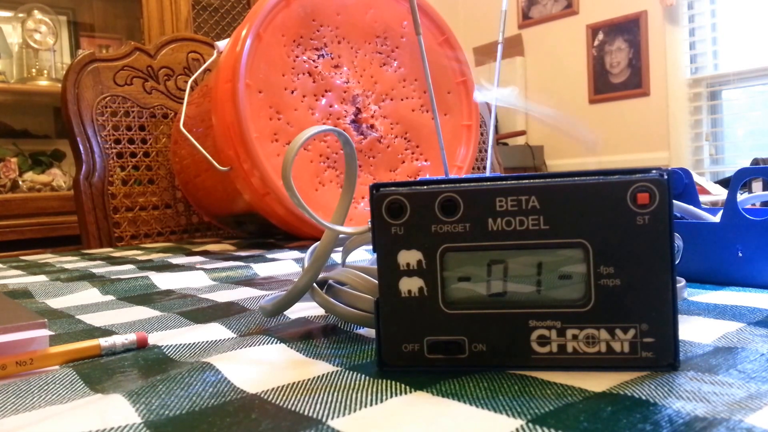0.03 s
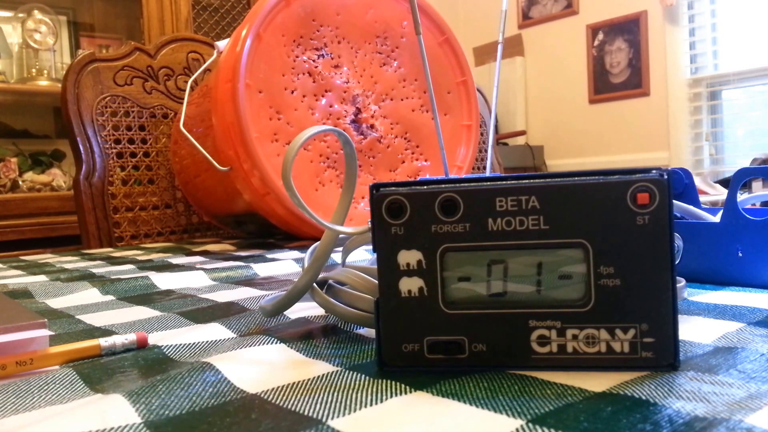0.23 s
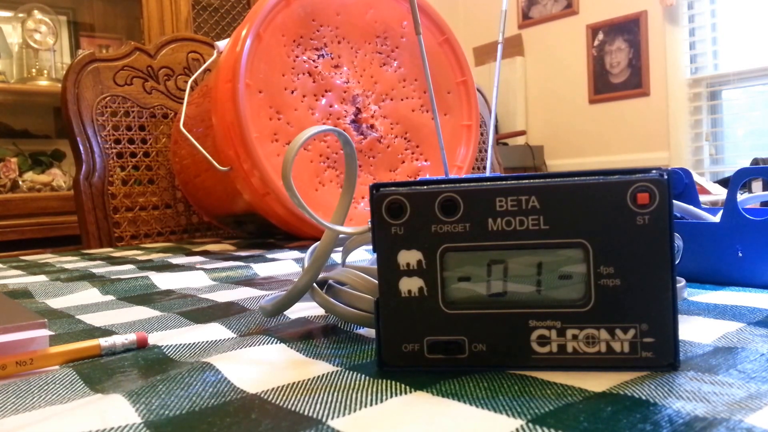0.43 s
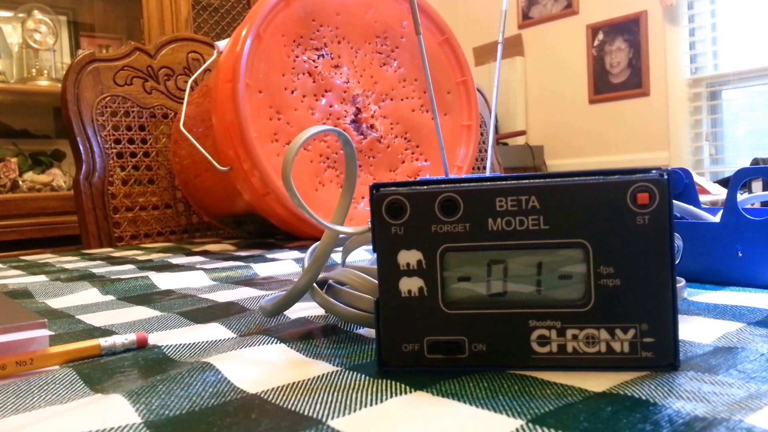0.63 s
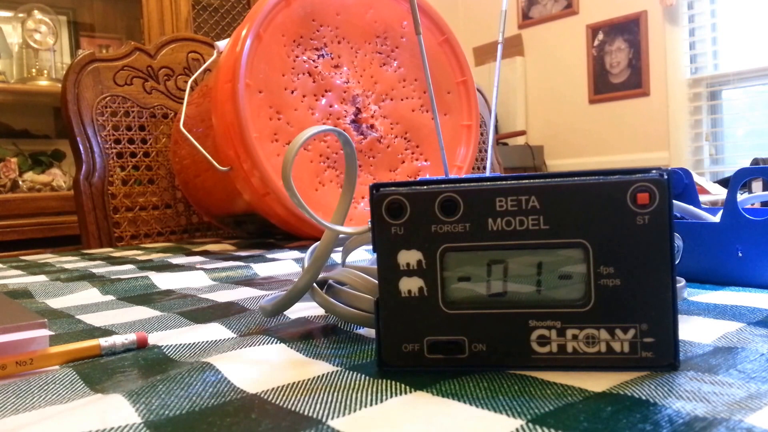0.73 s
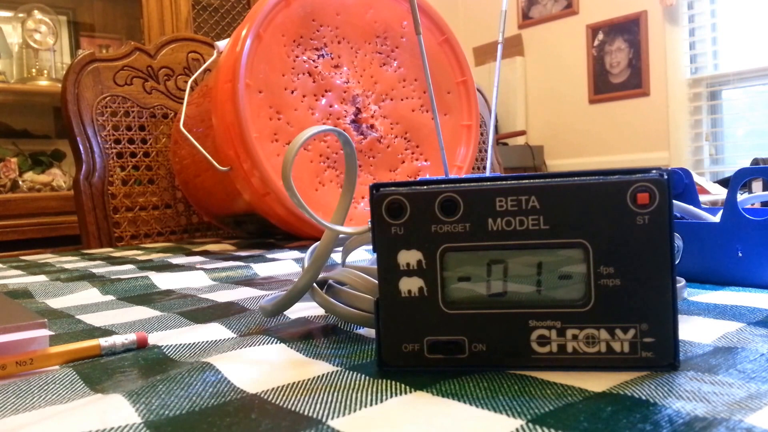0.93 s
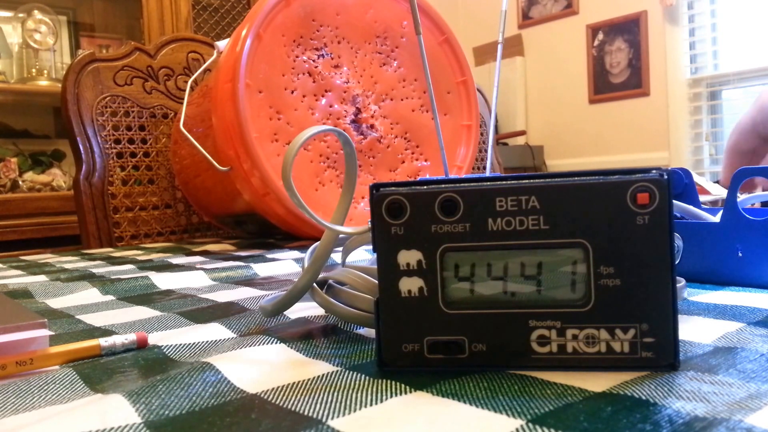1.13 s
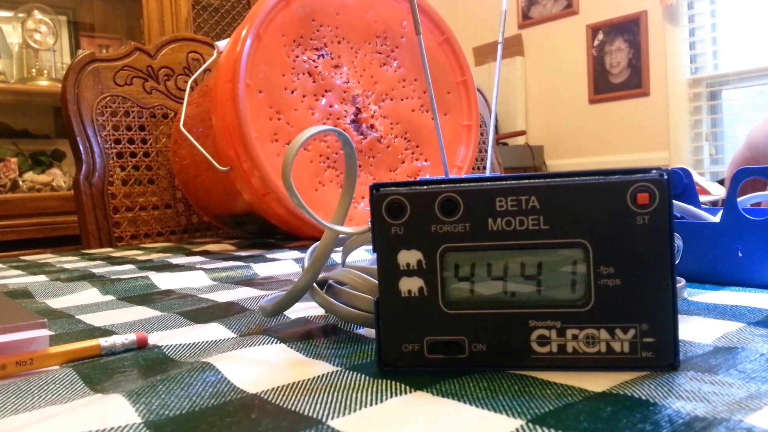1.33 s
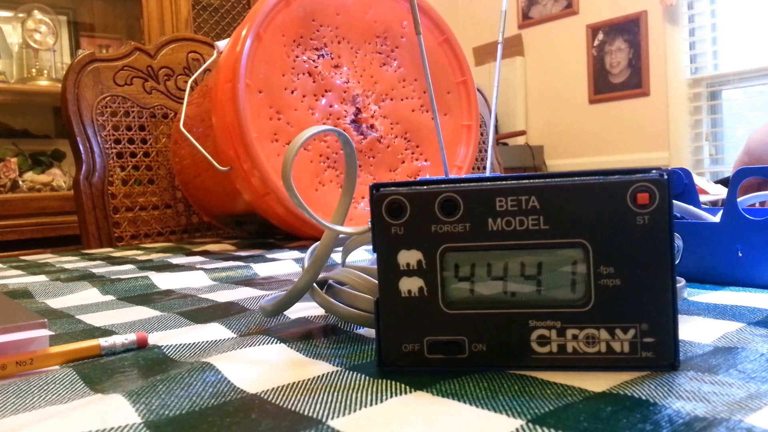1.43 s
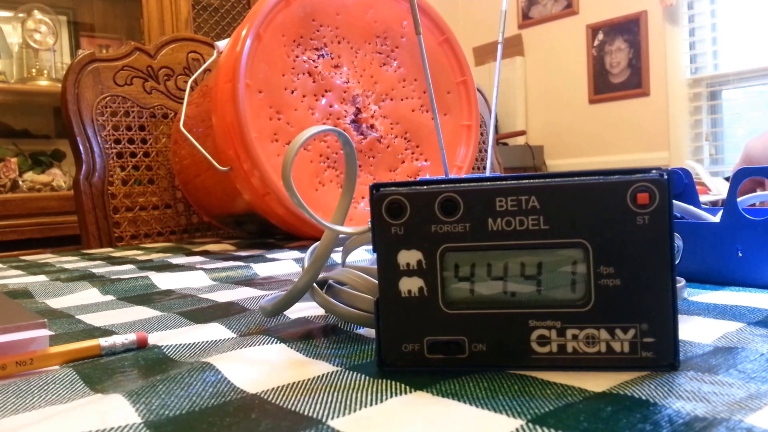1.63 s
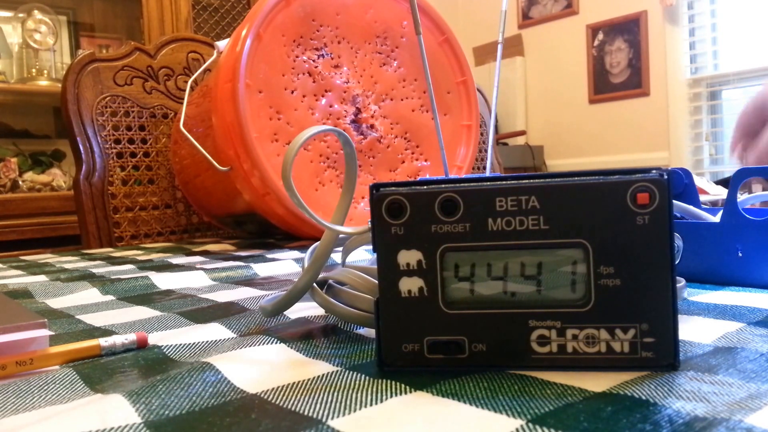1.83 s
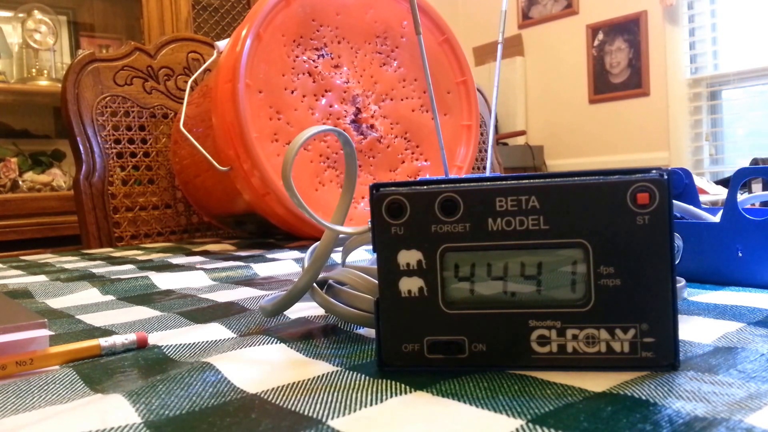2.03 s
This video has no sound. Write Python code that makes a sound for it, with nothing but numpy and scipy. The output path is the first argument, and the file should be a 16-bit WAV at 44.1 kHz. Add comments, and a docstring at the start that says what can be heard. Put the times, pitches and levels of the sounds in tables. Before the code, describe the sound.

A rubber band launcher goes off almost immediately: thin ticks at 0.03 seconds, then a tight burst of hard plastic slaps, loudest near 0.11, with rattling and hollow bucket knocks. A faint swish follows around 0.3 as the short room tail fades. Quiet hum and hiss remain. From 0.8 to 1.55 something slides with a faint low groan and rustle; small clicks cluster at 1.6 to 1.8, then it quiets.

```python
"""Rubber band launcher and plastic bucket

A rubber band is let go on a table: its launcher rattles (noise bursts, random grains, a dull thud) and the
band slaps a plastic bucket, which booms and rocks (dying modes). Then something slides with a low groan
(rough gliding sine), faint squeal (resonant noise) and rustle; small clicks and low bumps (resonant noise
bursts) are scattered through the sliding. A furnished room answers with noise tails; room hum and
microphone hiss are slowly wavering coloured noise."""
import sys
import numpy as np
from scipy import signal
from scipy.fft import rfft, irfft, next_fast_len
from scipy.io import wavfile
from scipy.ndimage import map_coordinates

SR = 44100
rng = np.random.default_rng(int(sys.argv[2]) if len(sys.argv) > 2 else 0)


def amplitude_ratio(level_db):
    """Convert a level in decibels to the matching linear amplitude (field) ratio."""
    exponent = np.asarray(level_db, float) / 20
    return 10 ** exponent


def wav_out(sig):
    """Save sig, one row per channel (or a flat mono array), as 16-bit PCM at SR to the path in sys.argv[1]."""
    wavfile.write(sys.argv[1], SR, np.round(np.clip(np.atleast_2d(sig).T, -1, 1) * 32767).astype(np.int16))


N = 91198


def unit(x):
    """Scale to rms 1."""
    return x / np.sqrt(np.mean(x ** 2) + 1e-20)


def along(points, hz):
    """Interpolate (hz, value) points on a log frequency axis."""
    point_hz, value = np.transpose(points)
    return np.interp(np.log(hz + 1), np.log(point_hz + 1), value)


def curves(rows):
    """One value per sample for each column after the time."""
    time_s, *columns = np.transpose(rows)
    return [np.interp(np.arange(N) / SR, time_s, column) for column in columns]


def wobble(knots_per_s):
    """Smooth random curve through normal-distributed knots."""
    knots = rng.standard_normal(int(N * knots_per_s / SR) + 4)
    return map_coordinates(knots, [np.arange(N) * knots_per_s / SR])


def filtered(x, response):
    """Apply a complex response of frequency."""
    n = x.shape[-1]
    padded = next_fast_len(n + 8192)
    return irfft(rfft(x, padded) * response(np.fft.rfftfreq(padded, 1 / SR)), padded)[..., :n]


def treble_of(x):
    """Zero-phase high-pass, half amplitude near 6 kHz."""
    return filtered(x, lambda hz: 1 / (1 + (6000 / (hz + 1)) ** 4))


def resonances(rows):
    """Causal response of (centre_hz, width_hz, level_db) peaks, alternating in sign."""
    def response(hz):
        total = 0
        for k, (centre, width, db) in enumerate(rows):
            damping = 1j * hz * width
            total = total + (-1) ** k * amplitude_ratio(db) * damping / (centre * centre - hz * hz + damping)
        return total
    return response


PITCH_SCATTER, LEVEL_SCATTER_DB = .025, 2.56  # standard deviations; pitch as a fraction


def rings(modes, near_hz, fall_db, share, t):
    """Close pairs of dying modes, losing fall_db per octave from the struck region; peak 1."""
    hz, level_db, t60_s = np.repeat(np.transpose(modes), 2, axis=1)[:, :, None]
    level_draw, pitch_draw = rng.standard_normal((2, *hz.shape))
    struck_db = level_db - fall_db * abs(np.log2(hz / near_hz)) + LEVEL_SCATTER_DB * level_draw
    decay_db = -60 * t / (share * t60_s)
    pairs = amplitude_ratio(struck_db + decay_db) * np.sin(2 * np.pi * hz * (1 + PITCH_SCATTER * pitch_draw) * t)
    ring = pairs.sum(0)
    return ring / np.abs(ring).max()


RISE_S = .0004  # time constant


def burst(spectrum, t60_s):
    """Coloured noise that rises fast and dies away; peak 1."""
    t = np.arange(4096) / SR
    noise = filtered(rng.standard_normal(4096), lambda hz: amplitude_ratio(along(spectrum, hz)))
    x = noise * amplitude_ratio(-60 * t / t60_s) * (1 - np.exp(-t / RISE_S))
    return x / np.abs(x).max()


WIDEST_DB = 8.5


def add(out, start_s, sound, db, left_right_db):
    """Place a sound by level difference, limited to WIDEST_DB."""
    at = round(start_s * SR)
    half_db = np.clip(left_right_db, -WIDEST_DB, WIDEST_DB) / 2
    sides = amplitude_ratio(db + np.array([[half_db], [-half_db]])) * sound
    out[:, at:at + len(sound)] += sides[:, :N - at]


# noise likeness of left and right: hz, likeness
ALIKE = [(40, 0.16), (300, 0.78), (1000, 0.13), (3000, 0.033), (12000, 0.08)]


def rush(spectrum):
    """Stereo noise of rms 1, mid and side shares set by the likeness."""
    def shares(hz):
        angle = np.arccos(np.clip(along(ALIKE, hz), -1, 1)) / 2
        return amplitude_ratio(along(spectrum, hz)) * [np.cos(angle), np.sin(angle)]
    mid, side = filtered(rng.standard_normal((2, N)), shares)
    return unit(np.array([mid + side, mid - side]))


# release ticks, thin and high: start_s, peak_db, left_right_db
TICKS = [(0.0253, -20.5, -1), (.030, -17.5, 2.5), (0.0344, -10, 3), (0.046, -6, -3), (0.1091, -14, 2.5),
         (0.298, -34.5, 7)]
# tick spectrum: hz, level_db
TICK_SPECTRUM = [(880, -36), (1500, 6), (3820, -6), (6140, -19.5), (11200, -9.5), (14200, -11),
                 (15800, -22.5)]
# hard plastic slaps: start_s, peak_db, struck_region_hz, left_right_db
SLAPS = [(0.050, -12.5, 3800, 5), (0.0531, -8.5, 3140, 2), (0.0565, -8.5, 2400, 6.5), (0.0643, -8, 3050, 5),
         (0.0772, -9, 3200, -1.5), (0.0865, -7, 3270, -0.5), (0.1098, -0.5, 4360, -4),
         (0.1134, -10.5, 3200, -2.5), (.125, -10.5, 4200, 1.5), (0.1299, -9, 4240, -5.5)]
# slap crack spectrum: hz, level_db
CRACK_SPECTRUM = [(1000, -26), (1600, -6), (3100, 2), (4400, -6), (5860, -19), (10900, -18.5),
                  (14500, -30.5), (15800, -45.5)]
# plastic modes the slaps ring: hz, level_db, t60_s
PLASTIC_MODES = [(2310, -11, .012), (3270, 0, 0.027), (3800, -6.5, .014), (4240, 1, .02)]
# rattle of loose parts, then slack band swishing down: time_s, level_db, treble_lift_db
RATTLE = [(.023, -62, 3.5), (.026, -36, -0.5), (.034, -25, 2), (.044, -33.5, 4), (.05, -18.5, -6),
          (.07, -24.5, 1.5), (.108, -28.5, -4.5), (.112, -20.5, 4), (.13, -22.5, -2), (.15, -33.5, -2),
          (.28, -57, -2), (.3, -41, 2.5), (.315, -35, -1), (.37, -53, 2), (.42, -59, 2)]
# rattle spectrum: hz, level_db
RATTLE_SPECTRUM = [(400, -16), (800, -4.5), (1200, -8), (1620, -13), (2400, -6), (3250, -7.5), (4280, -5.5),
                   (4900, -12.5), (6060, -16), (14000, -25), (15800, -57)]
TICK_T60_S, CRACK_T60_S = 0.0076, 0.0066
SLAP_FALL_DB_PER_OCTAVE, SLAP_RING_DB = 28.5, 3.5  # ring level is relative to the crack
RATTLE_PER_S, RATTLE_SPREAD_DB = 5000, 2


def launcher():
    """Impacts excite short noise and plastic modes; loose parts give a dense grain rattle."""
    out = np.zeros((2, N))
    for start_s, db, left_right_db in TICKS:
        add(out, start_s, burst(TICK_SPECTRUM, TICK_T60_S), db, left_right_db)
    for start_s, db, hz, left_right_db in SLAPS:
        crack = burst(CRACK_SPECTRUM, CRACK_T60_S)
        ring = rings(PLASTIC_MODES, hz, SLAP_FALL_DB_PER_OCTAVE, 1, np.arange(4096) / SR)
        slap = crack + amplitude_ratio(SLAP_RING_DB) * ring
        add(out, start_s, slap / np.abs(slap).max(), db, left_right_db)
    level_db, lift_db = curves(RATTLE)
    hits = rng.random((2, N)) < RATTLE_PER_S / SR
    grains = hits * rng.standard_normal((2, N)) * amplitude_ratio(RATTLE_SPREAD_DB * wobble(150))
    grains = grains + 0.098 * grains[::-1]  # slight left-right leak
    grains = unit(filtered(grains, lambda hz: amplitude_ratio(along(RATTLE_SPECTRUM, hz))))
    lifted = grains + (amplitude_ratio(lift_db) - 1) * treble_of(grains)
    sample = np.arange(N)
    live = (sample > RATTLE[0][0] * SR) & (sample < RATTLE[-1][0] * SR)
    return out + lifted * live * amplitude_ratio(level_db)


# hollow knocks: start_s, peak_db, struck_region_hz, share_of_full_ring_time
KNOCKS = [(0.032, -17.5, 494, 0.67), (.040, -19, 330, 0.58), (.050, -11, 1310, 0.46),
          (.064, -12.5, 815, 0.47), (.083, -14.5, 578, 0.46), (.112, -13, 540, 0.48),
          (.144, -21.5, 504, 0.65), (.168, -16.5, 450, 1.0), (.168, -16.5, 980, 0.74),
          (.185, -24.5, 725, 1), (.206, -21.5, 433, 0.92), (.242, -27.5, 650, 0.56),
          (.272, -28.5, 730, 0.61)]
# bucket modes: hz, level_db, full_t60_s
BUCKET_MODES = [(270, -11, 0.048), (330, -8.5, 0.076), (431, -4, 0.098), (523, -0.5, 0.063),
                (586.3, -6, 0.12), (650, -9.5, 0.1), (730, -3.5, 0.11), (824, -6.5, 0.083),
                (958, -3.5, 0.045), (1042, -7, 0.026), (1198, -6.5, .07), (1445, -8, 0.068)]
KNOCK_RISE_S, KNOCK_FALL_DB_PER_OCTAVE = 0.0012, 15  # soft contact


def bucket():
    """Each knock rings the same hollow modes, most those near the struck region."""
    out, t = np.zeros((2, N)), np.arange(SR // 4) / SR
    for start_s, db, near_hz, share in KNOCKS:
        ring = rings(BUCKET_MODES, near_hz, KNOCK_FALL_DB_PER_OCTAVE, share, t)
        ring = ring * (1 - np.exp(-t / KNOCK_RISE_S))
        add(out, start_s, ring / np.abs(ring).max(), db, -1.2)
    return out


THUD_START_S, THUD_DB, THUD_HZ, THUD_T60_S, THUD_RISE_S = 0.0327, -31.5, 137.7, .12, 0.0044


def thud():
    """The launcher jolts the table top: one dull decaying sine."""
    out, t = np.zeros((2, N)), np.arange(SR // 4) / SR
    envelope = amplitude_ratio(-60 * t / THUD_T60_S) * (1 - np.exp(-t / THUD_RISE_S))
    add(out, THUD_START_S, envelope * np.sin(2 * np.pi * THUD_HZ * t), THUD_DB, 1.5)
    return out


# sliding levels before the trims below: time_s, squeal_db, rustle_db
SLIDE = [(0.42, -61, -52.5), (0.61, -66.5, -59), (0.834, -70, -54.5), (0.862, -70, -61),
         (0.912, -80, -60.5), (1.04, -74, -77), (1.122, -64, -65.5), (1.254, -59, -55), (1.314, -64, -58.5),
         (1.382, -66, -49.5), (1.566, -67, -57.5), (1.58, -58, -49.5), (1.656, -62.5, -57),
         (1.708, -52.5, -51.5), (1.74, -61, -53), (1.762, -47.5, -45), (1.944, -99, -74),
         (2.06, -87.5, -85.5)]
# low groan: time_s, level_db, pitch_hz (before drift)
GROAN = [(.78, -67, 339.7), (.825, -50.5, 342), (.86, -62, 330), (1.0, -61.5, 280.6), (1.14, -56, 284.3),
         (1.16, -53, 338), (1.2, -45.5, 289.3), (1.235, -51.5, 286.5), (1.28, -47.5, 260.3),
         (1.32, -54.5, 263.7), (1.35, -48.5, 318.2), (1.4, -47, 302), (1.45, -53, 270), (1.52, -52, 299.5),
         (1.58, -85, 289)]
# squeal resonances, passed twice: centre_hz, width_hz, level_db (per pass)
SQUEAL = [(2236, 290, -4), (4480, 1160, -5.5)]
# rustle spectrum: hz, level_db
RUSTLE_SPECTRUM = [(180, -79), (300, -9.5), (573, -15.5), (711, -13), (1520, -19.5), (3490, -18),
                   (5740, -30), (14500, -29), (14900, -75.5)]
GROAN_ROUGH, GROAN_ROUGH_KNOTS_PER_S, GROAN_DRIFT_HZ, GROAN_SIDE = .85, 100, 5, 0.18
SQUEAL_TRIM_DB, RUSTLE_TRIM_DB = 2, 1.5
RUSTLE_BRIGHTENS, RUSTLE_MID_DB = 0.35, -48  # treble dB gained per dB of level, about this level


def slide():
    """Friction: a rough gliding groan, noise in two fixed resonances and a rustle brighter when louder."""
    squeal_db, rustle_db = curves(SLIDE)
    groan_db, pitch_hz = curves(GROAN)
    phase = 2 * np.pi * np.cumsum(pitch_hz + GROAN_DRIFT_HZ * wobble(29.7)) / SR
    rough = [wobble(GROAN_ROUGH_KNOTS_PER_S) for _ in range(3)]
    mid = np.sin(phase) + GROAN_ROUGH * (rough[0] * np.sin(phase) + rough[1] * np.cos(phase))
    side = GROAN_SIDE * rough[2] * np.sin(phase)
    groan = unit(np.array([mid + side, mid - side]))
    squeal = unit(filtered(rng.standard_normal((2, N)), lambda hz: resonances(SQUEAL)(hz) ** 2))
    rustle = rush(RUSTLE_SPECTRUM)
    lift_db = RUSTLE_BRIGHTENS * (rustle_db - RUSTLE_MID_DB)
    rustle = rustle + (amplitude_ratio(lift_db) - 1) * treble_of(rustle)
    total = amplitude_ratio(groan_db) * groan
    total = total + amplitude_ratio(squeal_db + SQUEAL_TRIM_DB) * squeal
    total = total + amplitude_ratio(rustle_db + RUSTLE_TRIM_DB + 1.8 * wobble(39.9)) * rustle
    fade_in = np.clip((np.arange(N) / SR - SLIDE[0][0] + 0.15) / 0.29, 0, 1)
    return fade_in * total


# small clicks and low bumps through the sliding: start_s, level_db (peak of the hard part),
# left_right_db, body_db (relative to the hard part), brightness_db_per_octave
CLICKS = [(0.772, -51, 0, 11, -6), (0.7896, -48, 4, -5.5, -14), (0.882, -51, 0, 11, -8),
          (0.996, -57, 0.5, 11, -8), (1.4057, -40, 5, -12, -6), (1.5753, -34.5, 0, -14, -7.5),
          (1.5801, -27.5, 5.5, -20, -6), (1.5919, -29.5, 6, -25, -5), (1.6109, -34.5, -4, -17, 3),
          (1.6677, -41, -4.5, -19, 5.5), (1.6937, -36, 3, -18, -1), (1.7538, -28.5, 0, -8.5, -2.5),
          (1.761, -39, -1, 4, -3.5), (1.7698, -29.5, -2, -20, -7), (1.778, -36.5, 0, -5, -0.5)]
# click resonances: centre_hz, width_hz, level_db
CLICK_RESONANCES = [(1030, 240, -5.5), (1400, 440, -5), (1930, 560, -0.5), (3470, 400, 4.5),
                    (4610, 1100, -3), (8850, 8000, -14)]
CLICK_T60_S, CLICK_BODY_HZ, CLICK_BODY_WIDTH_HZ = 0.022, 400, 350


def clicks():
    """Short noise puffs through shared resonances, each with its own share of low body."""
    out, t = np.zeros((2, N)), np.arange(2048) / SR
    body_response = resonances([(CLICK_BODY_HZ, CLICK_BODY_WIDTH_HZ, 0)])
    for start_s, db, left_right_db, body_db, tilt_db in CLICKS:
        def hard_response(hz):
            octaves = np.log2(np.maximum(hz, 900) / 2500)
            return resonances(CLICK_RESONANCES)(hz) * amplitude_ratio(tilt_db * octaves)
        puff = rng.standard_normal(2048) * amplitude_ratio(-60 * t / CLICK_T60_S)
        hard = filtered(puff, hard_response)
        body = filtered(np.abs(puff), body_response)
        click = hard / np.abs(hard).max() + amplitude_ratio(body_db) * body / np.abs(body).max()
        add(out, start_s, click, db, left_right_db)
    return out


# room decay: hz, t60_s
ROOM_DECAY = [(150, 0.38), (500, 0.46), (2000, 0.42), (5000, 0.46), (12000, 0.34)]
ROOM_GAP_S, ROOM_ALIKE_HZ = .008, 600


def room(x, piece=2048):
    """Noise tails, each frequency dying at its own speed; every audible piece gets a new tail."""
    out = np.zeros((2, N + SR + piece))
    start = round(ROOM_GAP_S * SR)
    for at in range(0, N, piece):
        if np.any(np.abs(x[at:at + piece]) > 1e-4):
            hz, t, z = signal.stft(rng.standard_normal((2, SR * 3 // 4)), SR, nperseg=256)
            same = 1 / (1 + (hz[:, None] / ROOM_ALIKE_HZ) ** 2)  # left and right agree in the bass
            z[1] = same * z[0] + np.sqrt(1 - same ** 2) * z[1]
            decay = amplitude_ratio(-60 * t / along(ROOM_DECAY, hz)[:, None])
            tail = signal.istft(z * decay, SR, nperseg=256)[1]
            tail = tail / np.linalg.norm(tail[0])
            wet = signal.fftconvolve(x[None, at:at + piece], tail, axes=1)
            out[:, at + start:at + start + wet.shape[1]] += wet
    return out[:, :N]


# background levels before wavering: time_s, hum_db, hiss_db
BACKGROUND = [(0.45, -57.5, -54), (0.95, -59, -53.5), (1.314, -58, -54.5), (1.764, -61.5, -53.5),
              (1.902, -55.5, -55), (2.0, -73.5, -56)]
# room hum spectrum: hz, level_db
HUM_SPECTRUM = [(150, -39), (300, -5), (500, -1), (800, -8.5), (1300, -14.5), (2000, -37)]
# broad microphone noise spectrum, strongest in the bass: hz, level_db
HISS_SPECTRUM = [(12, -63.5), (25, -31.5), (60, -16.5), (130, -9.5), (250, -5), (400, -10), (700, -18),
                 (1200, -22.5), (2200, -23), (4500, -26), (6300, -31), (9000, -29), (14550, -27.5),
                 (14900, -75)]


def background():
    """Room hum as low-mid noise and microphone hiss as broad noise, each wavering in level."""
    hum_db, hiss_db = curves(BACKGROUND)
    hiss = amplitude_ratio(hiss_db + 1.5 * wobble(4.53)) * rush(HISS_SPECTRUM)
    hum = amplitude_ratio(hum_db + 1.9 * wobble(13.28)) * rush(HUM_SPECTRUM)
    return hiss + hum


LOW_CUT_HZ, LEFT_LEAD_S = 167, 0.00023
ROOM_DB, BUCKET_ROOM_DB = -4.5, -4  # bucket send is relative to the other hits


def scene():
    """Hits in the room, thin in the bass, over thud, sliding and background; the left channel leads."""
    bright, hollow = launcher() + clicks(), bucket()
    room_send = (bright + amplitude_ratio(BUCKET_ROOM_DB) * hollow).mean(0)
    wet = amplitude_ratio(ROOM_DB) * room(room_send)
    hits = filtered(bright + hollow + wet, lambda hz: (1j * hz / (LOW_CUT_HZ + 1j * hz)) ** 3)
    mix = hits + thud() + slide() + background()
    sides = np.array([[1], [-1]])
    return filtered(mix, lambda hz: np.exp(1j * np.pi * hz * LEFT_LEAD_S * sides))


def low_pass(x):
    """Removes everything above the highest recorded frequency."""
    return signal.sosfilt(signal.butter(12, 16090, fs=SR, output="sos"), x)


CEILING = .85


def record(dry):
    """The loudest peaks round off towards CEILING, then a steep treble cut."""
    soft = dry / (1 + np.abs(dry / CEILING) ** 6) ** (1 / 6)
    finished = filtered(soft, lambda hz: hz < SR * .36)
    return low_pass(finished)


dry = scene()
out = record(dry)
wav_out(out)
```